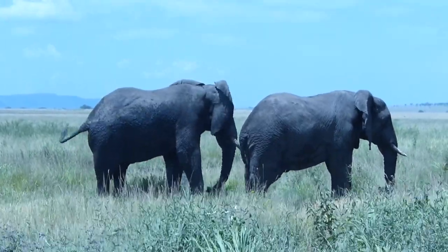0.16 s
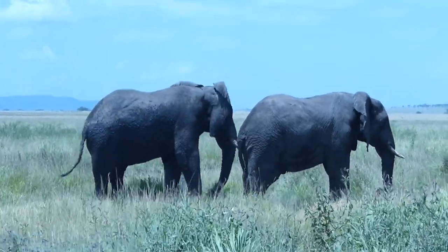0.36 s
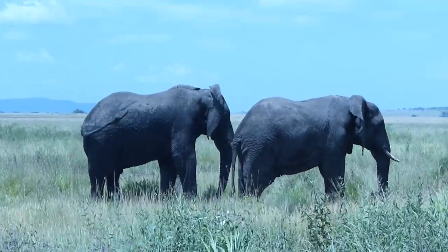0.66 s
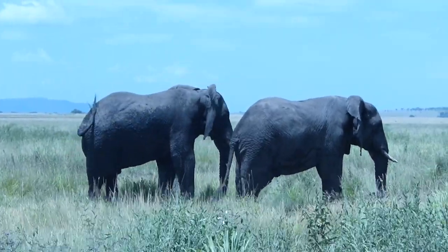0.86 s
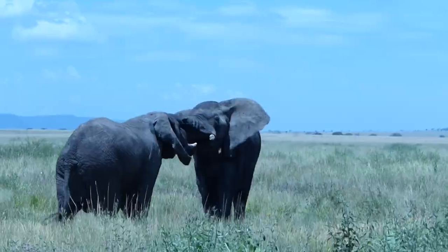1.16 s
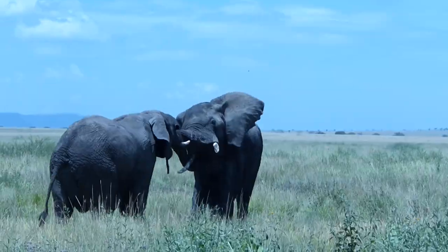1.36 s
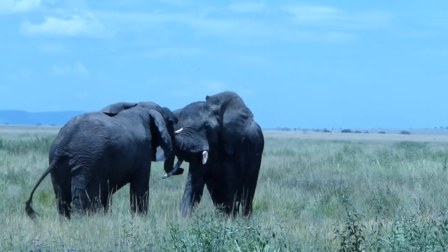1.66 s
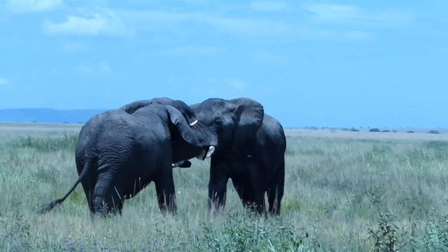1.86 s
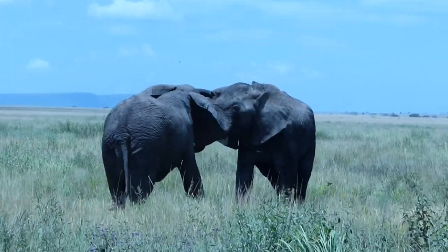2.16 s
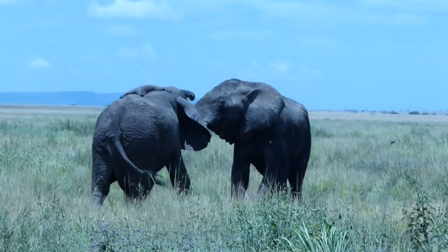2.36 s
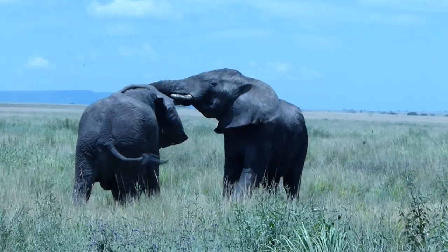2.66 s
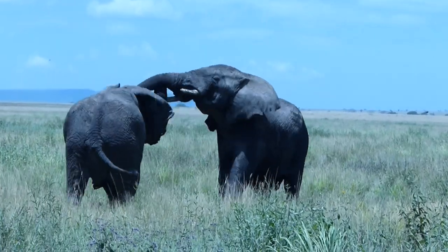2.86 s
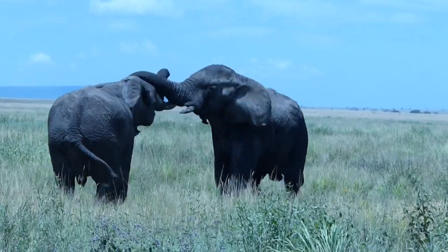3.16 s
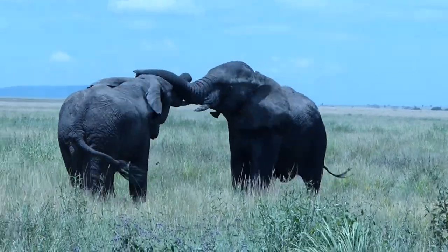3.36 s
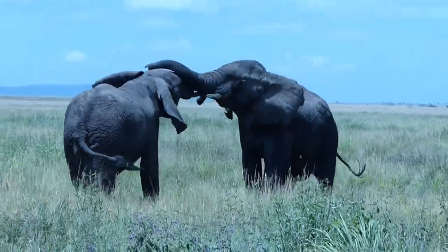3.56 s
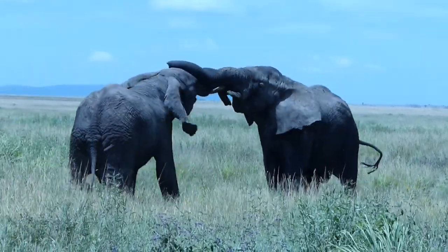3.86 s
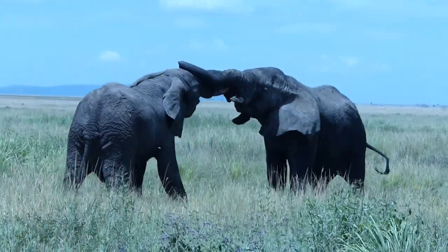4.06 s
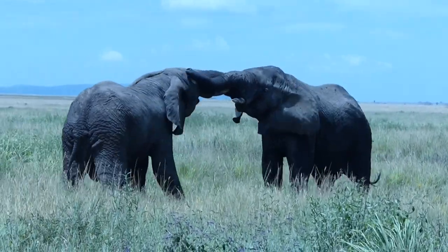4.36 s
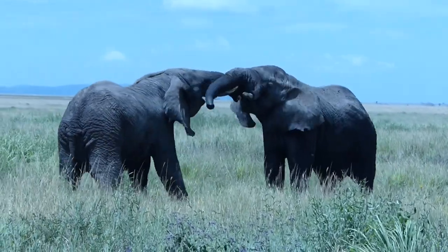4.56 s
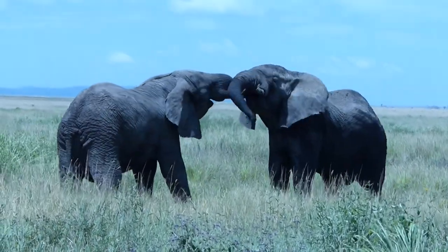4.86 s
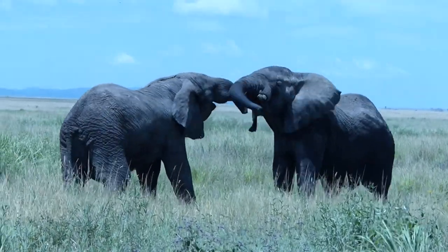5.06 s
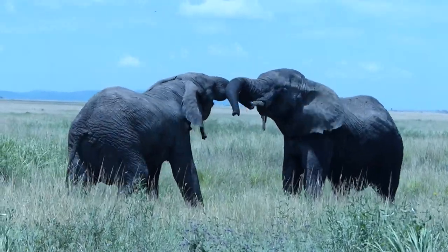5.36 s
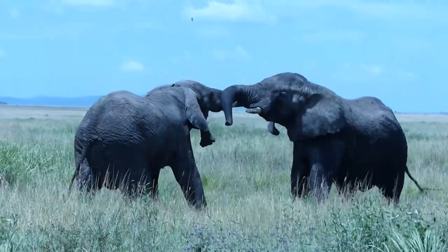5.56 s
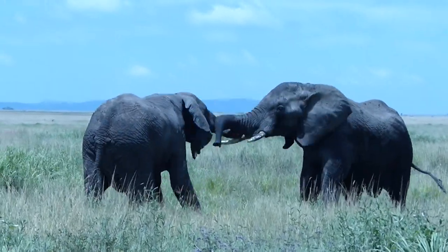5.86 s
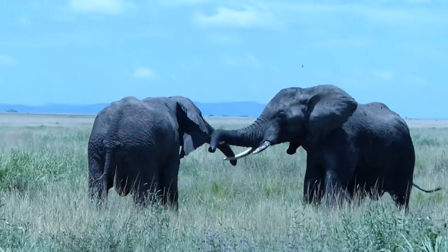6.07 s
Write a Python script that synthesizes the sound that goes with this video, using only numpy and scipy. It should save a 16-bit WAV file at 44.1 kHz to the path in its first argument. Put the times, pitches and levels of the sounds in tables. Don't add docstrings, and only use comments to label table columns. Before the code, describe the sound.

Faint open grassland air opens with a low wind puff on the microphone, distant hum and thin grass hiss. A small sharp handling knock and tick falls at 0.5 s. At 1.1 s everything cuts to complete silence until 1.4 s, when slightly windier air returns. Close and slightly left, a small camera motor ratchets loudly from 1.5 to 2.1 s: about eleven cycles a second, each an uneven chain of bright metal and plastic clicks ringing a hard hollow shell. It repeats at 2.6-3.2 s, longest at 3.5-4.4 s while fading slightly, and briefly at 4.7-5.1 s. Soft knocks, faint ticks and tiny far chirps sit in the gaps. From 5.4 s quiet dry stalk ticks, crackly brushes and chirps gather, with a tiny high squeak near 5.9 s and a final wind gust at 6.2 s.

```python
import sys
import numpy as np
from scipy import signal
from scipy.io import wavfile

SR = 44100
rng = np.random.default_rng(int(sys.argv[2]) if len(sys.argv) > 2 else 0)


def ratio_of_db(decibels):
    return 10 ** (np.asarray(decibels, float) / 20)


def file_out(sig):
    cols = np.atleast_2d(sig).T
    lim = np.clip(cols, -1, 1)
    pcm = np.round(lim * 32767).astype(np.int16)
    wavfile.write(sys.argv[1], SR, pcm)


N = 273552
TIME_S = np.arange(N) / SR
SILENCE_START_S, SILENCE_END_S = 1.118, 1.4055


def at_hz(points, hz):
    table_hz, values = np.transpose(points)
    return np.interp(np.log(hz), np.log(table_hz), values)


def rms_one(x):
    return x / np.sqrt(np.mean(x ** 2) + 1e-20)


def drift(rate_hz):
    r = np.exp(-80 * np.pi * rate_hz / SR)
    noise = rng.standard_normal(N // 40 + 1002)
    slow = signal.lfilter([1], [1, -2 * r, r * r], noise)[1000:]
    return np.interp(np.arange(N) / 40, np.arange(len(slow)), rms_one(slow))


def resonance(x, hz, width_hz):
    r = np.exp(-np.pi * width_hz / SR)
    b = np.sqrt((1 - r * r) / 2) * np.array([1, 0, -1])
    return signal.lfilter(b, [1, -2 * r * np.cos(2 * np.pi * hz / SR), r * r], x)


def left_right(pan_db):
    return ratio_of_db(pan_db / 2 * np.array([[1], [-1]]))


def pair(mid, side, alike, pan_db):
    alike = np.clip(alike, -1, 1)
    common = np.sqrt(1 + alike) * mid
    opposed = np.sqrt(1 - alike) * side
    left = (common + opposed) * ratio_of_db(pan_db / 2)
    right = (common - opposed) * ratio_of_db(-pan_db / 2)
    return np.stack([left, right]) / np.sqrt(2)


def rattle(shape, spread_db):
    uneven_db = spread_db * np.minimum(rng.exponential(1, shape), 5)
    return rms_one(rng.standard_normal(shape) * ratio_of_db(uneven_db))


# first_cycle_s [s], last_cycle_s [s], first_level_db [dB], last_level_db [dB]
BURSTS = [
    (1.4896, 2.0298, 0, 0),
    (2.6254, 3.076, -0.5, 0),
    (3.544, 4.3537, -0.5, -1.95),
    (4.686, 5.0455, -1, -2.1),
]
CYCLE_S = .09


def cycle_times():
    starts, levels_db, last = [], [], []
    for first_s, last_s, first_db, last_db in BURSTS:
        count = round((last_s - first_s) / CYCLE_S) + 1
        starts += list(np.linspace(first_s, last_s, count))
        levels_db += list(np.linspace(first_db, last_db, count))
        last += [0] * (count - 1) + [1]
    return starts, levels_db, last


LEAD, SIZE = 200, 7000
FORCE_DB = .8

# start_ms [ms], build_up_ms [ms per 9 dB], die_away_ms [ms per 9 dB],
# metal_db [dB], body_db [dB]
CONTACTS = [(1.7, 1.8, 2.0, -13, -28), (4.5, 1, 8.5, -25.5, -32), (13.8, 2, 3, -22.5, -29),
            (15.74, 2, 2, -21, -27), (19.6, 1.5, 5, -27.5, -30.5), (24.5, 1, 6, -33, -36),
            (34.35, 2, 1, -20, -30.5), (37.4, 1.1, 1.5, -12, -29), (39.5, 0.9, 3.5, -14, -27),
            (45, 0, 8, -25.5, -35.5), (51.7, 1.5, 12, -25, -32.5), (56.5, 0.3, 8, -26.5, -30),
            (60.34, 0.2, 1.5, -15.5, -36), (63.95, 1.9, 2.5, -10, -24), (66.8, 1.5, 8.5, -18, -27.5),
            (73.5, 1, 6, -25.5, -33.5), (80.3, 2, 3.5, -29, -33)]
SETTLING = [
    (90.6, 2.2, 3.9, -24.5, -33),
    (101.7, 2.2, 5.6, -35, -39.5),
]


def contact_swarms(last, slack_ms=.15):
    table = np.array(CONTACTS + SETTLING)
    shape = (len(last), len(table), 1)
    ms = (np.arange(SIZE) - LEAD) * 1e3 / SR
    late = ms - table[:, :1] - slack_ms * rng.standard_normal(shape)
    swarm = np.exp(np.where(late < 0, late / table[:, 1:2], -late / table[:, 2:3])) ** 2
    swarm *= ratio_of_db(2 * FORCE_DB * rng.standard_normal(shape))
    swarm[:, len(CONTACTS):] *= np.reshape(last, (-1, 1, 1))
    first = np.roll(last, 1)[:, None]
    kick = 1 + first * 0.68 * (ms < 2.5)
    swarm *= np.where(first * (ms < .6), .002, kick)[:, None]
    return swarm


# start_ms [ms], middle_db [dB], hollow_db [dB], deep_db [dB]
BLOWS = [(1.302, -26.5, -36.5, -52), (15.3, -26, -33.5, -52), (22.07, -33.5, -57, -46.5),
         (35.53, -45, -33, -43), (39, -32.5, -35, -55.5), (54.48, -43, -44, -48), (62.1, -32.5, -47, -53),
         (64.05, -35.5, -31.5, -43.5), (69, -43, -32.5, -48.5)]


def clean_blows(count, jitter_ms=.03):
    blows = np.array(BLOWS)
    ms = blows[:, 0] + jitter_ms * rng.standard_normal((count, len(blows)))
    at = (LEAD + ms * SR / 1e3).astype(int)
    return at, ratio_of_db(FORCE_DB * rng.standard_normal(at.shape))


# pitch_hz [Hz], width_hz [Hz], level_db [dB]
BRIGHT = [(3500, 380, -4.5), (4120, 280, -0.5), (5000, 380, -0.5), (5620, 530, -0.5), (6480, 450, 0.5),
          (7400, 640, 0), (8270, 670, -2), (9260, 410, -2.5), (10540, 780, -4), (11800, 1300, -7.5),
          (14100, 2200, -22)]
MIDDLE = [(1295, 100, -6), (1400, 80, -4.5), (1516, 90, -4.5), (1730, 140, -5.5), (1970, 200, -3),
          (2353, 150, -0.5), (2613, 164, -1), (2933, 160, -3)]
HOLLOW = [(811, 42, -11), (916, 38, -5), (1007.7, 44, -1.5), (1056, 44, -4), (1107.5, 45, 3.5)]
DEEP = [(500, 35, -1), (550.3, 35, 2), (643, 35.3, 3)]
# repeated_share [0-1, same in each cycle], left_right_likeness [0-1],
# left_over_right_db [dB]
SHELL = [
    (.4, .79, 3.0),
    (.55, .5, 5.0),
    (.7, .2, 7.0),
    (.7, .75, -1.0),
]


def ring_shell(k, swarm, blow_at, blow_force, colour_db=1.5):
    modes = (BRIGHT, MIDDLE, HOLLOW, DEEP)[k]
    coupling_db = (0, 0, -10.5, -20.5)[k]
    repeat, alike, pan_db = SHELL[k]
    table, blows = np.array(CONTACTS + SETTLING), np.array(BLOWS)
    rows = np.arange(len(swarm))[:, None]
    group = 0
    for order, (hz, width_hz, db) in enumerate(modes):
        level_db = table[:, 4] + coupling_db if k else table[:, 3]
        level_db = level_db + (level_db + 16) * .22 * max(np.log(hz / 7000), 0)
        drive = ratio_of_db(level_db + db - 6.5 + colour_db * rng.standard_normal(len(table)))
        if order % 3 == 0:
            same_hits = rattle((2, 1, SIZE), 2.84)
            new_hits = rattle((2, len(swarm), SIZE), 2.64)
            hits = np.sqrt(repeat) * same_hits + np.sqrt(1 - repeat) * new_hits
        strength = np.sqrt(np.einsum("c,fct->ft", drive ** 2, swarm))
        force = (-1) ** order * strength * hits
        if k:
            blow = blow_force * ratio_of_db(blows[:, k] + db) / np.sqrt(4 * np.pi * width_hz / SR)
            quarter_turn = round(SR / hz / 4)
            force[0, rows, blow_at] += blow
            force[1, rows, blow_at + quarter_turn] += blow
        mid, side = resonance(force + 1e-12, hz, width_hz)
        group = group + pair(mid, side, alike * min(5000 / hz, 1) ** .4, pan_db)
    edge_hz = .85 * modes[0][0] * (1 if k else .6)
    return signal.sosfilt(signal.butter(3, edge_hz, "high", fs=SR, output="sos"), group)


def mechanism():
    starts, levels_db, last = cycle_times()
    swarm = contact_swarms(last)
    blow_at, blow_force = clean_blows(len(starts))
    cycles = sum(ring_shell(k, swarm, blow_at, blow_force) for k in range(4))
    out = np.zeros((2, N))
    for k, s in enumerate(starts):
        at = round(s * SR) - LEAD
        out[:, at:at + SIZE] += ratio_of_db(levels_db[k]) * cycles[:, k]
    return out


def running(edge_s=.08):
    return sum(np.clip(np.minimum(TIME_S - first_s, last_s + CYCLE_S - TIME_S) / edge_s, 0, 1)
               for first_s, last_s, *_ in BURSTS)


# start_s [s], peak_db [dB], pitch_hz [Hz], left_over_right_db [dB]
KNOCKS = [(.03, -41, 206, 2), (.04, -48, 480, 0), (.4808, -29.5, 735, 2), (.535, -43, 148, 0),
          (.555, -47.5, 350, 0), (2.19, -40, 500, 0), (2.2, -42.5, 300, 0), (2.267, -39, 800, 0),
          (2.268, -43.5, 1150, 0), (2.293, -40, 1150, 0), (2.31, -42, 597, 0), (2.32, -45.5, 200, 0),
          (2.402, -41, 550, 0), (2.412, -41, 453, 0), (2.412, -44.5, 190, 0), (3.367, -43, 795, 2),
          (3.378, -39, 480, 6), (5.26, -39, 188, -3), (5.745, -41, 740, 2), (5.95, -43, 740, 2)]


def knocks(swings=17.0):
    out, t = np.zeros((2, N)), np.arange(4000) / SR
    for s, db, hz, pan_db in KNOCKS:
        at = round(s * SR)
        fade = ratio_of_db(db + 4.5 - 60 * t * hz / swings)
        ring = fade * (1 - np.exp(-t * hz)) * np.sin(2 * np.pi * hz * t)
        out[:, at:at + len(t)] += ring * left_right(pan_db)
    return out


# start_s [s], peak_db [dB], pitch_hz [Hz], left_over_right_db [dB]
TICKS = [(.4805, -26, 3200, 1), (0.4809, -33, 6460, 0.5), (0.481, -41, 1400, 2), (5.4194, -44, 10000, 0),
         (5.705, -36, 9000, 5), (5.755, -44, 2500, 2), (5.765, -38, 11000, -1), (5.785, -31, 1500, 7),
         (5.785, -34, 4500, 7), (5.829, -37, 3000, 6), (6.05, -40, 2500, 5), (3.366, -38, 2400, 2),
         (3.415, -39.5, 3000, 2), (3.318, -40, 3000, 1), (1.407, -35.5, 5000, 4)]


def stalk_ticks():
    out, t = np.zeros((2, N)), np.arange(4000) / SR
    for s, db, hz, pan_db in TICKS:
        at = round(s * SR)
        snap = resonance(rng.standard_normal(len(t)) * np.exp(-t / 0.0016), hz, 0.58 * hz)
        out[:, at:at + len(t)] += ratio_of_db(db - 1.5) * snap * left_right(pan_db)
    return out


# centre_s [s], length_s [s], level_db [dB], pitch_hz [Hz]
BRUSHES = [(2.44, 0.034, -55, 6000), (3.513, .04, -50, 6000), (5.555, 0.011, -47, 6000),
           (5.718, 0.013, -40, 7000), (5.798, 0.009, -44, 7000), (5.838, .015, -38.5, 7400),
           (5.872, 0.021, -41.5, 6360), (5.938, .015, -44.5, 5500), (5.987, .012, -46, 5500),
           (6.059, 0.024, -40.5, 7400), (6.102, 0.0091, -41, 6000), (6.189, 0.014, -46, 6500)]


def brushes(pan_db=4.5):
    out = np.zeros((2, N))
    for s, length_s, db, hz in BRUSHES:
        at = np.arange(round((s - .1) * SR), min(round((s + .1) * SR), N))
        swell = ratio_of_db(db) * np.exp(-.5 * ((at / SR - s) / length_s) ** 2)
        crackle = resonance(rattle((2, len(at)), 2.2), hz, 0.71 * hz)
        mid, side = resonance(crackle, hz, 1.0 * hz)
        out[:, at] += swell * rms_one(pair(mid, side, 0.74, pan_db))
    return out


# time_s [s], pitch_hz [Hz], level_db [dB]
SQUEAK = [
    (5.865, 7440, -70),
    (5.872, 7600, -43),
    (5.886, 7570, -40),
    (5.892, 7000, -50),
    (5.897, 6600, -77),
]


def squeak():
    s, hz, db = np.transpose(SQUEAK)
    pitch_hz = np.interp(TIME_S, s, hz) * (1 + .01 * drift(147))
    tone = np.sin(2 * np.pi * np.cumsum(pitch_hz) / SR)
    heard = (TIME_S > s[0]) * (TIME_S < s[-1])
    return ratio_of_db(np.interp(TIME_S, s, db) + 11) * tone * heard


def opening_offset(step_db=-50, settle_s=.16):
    t = TIME_S - SILENCE_END_S
    return ratio_of_db(step_db) * (t > 0) * np.exp(-np.abs(t) / settle_s)


# centre_s [s], length_s [s], level_db [dB], pitch_hz [Hz]
CHIRPS = [(2.31, .01, -60, 4400), (2.56, .014, -52, 4300), (3.475, .022, -55, 4300),
          (3.53, .015, -51, 4350), (3.437, .004, -49, 6400), (2.45, .012, -60, 2050),
          (5.563, .008, -52, 7100), (5.72, .012, -51, 6200), (5.8, .015, -51, 4100),
          (5.86, .025, -49, 6100), (5.94, .006, -48, 6000), (5.988, .006, -51, 6300),
          (6.058, .015, -51, 7100), (6.09, .02, -56, 6100)]


def chirps():
    out = np.zeros((2, N))
    for s, length_s, db, hz in CHIRPS:
        at = np.arange(round((s - .05) * SR), round((s + .05) * SR))
        whistle = resonance(resonance(rng.standard_normal(len(at)), hz, 250), hz, 250)
        swell = np.exp(-.5 * ((at / SR - s) / length_s) ** 2)
        out[:, at] += ratio_of_db(db) * swell * rms_one(whistle)
    return out


def rises(events):
    return sum(db * np.exp(-.5 * ((TIME_S - s) / length_s) ** 2) for s, length_s, db in events)


def air(spectrum, likeness, levels_db, patchy_db, pan_db, span_s):
    parts = [0, 0, 0]
    edges = 32.5 * 2 ** (np.arange(28) / 3)
    a, b = (round(s * SR) for s in span_s)
    white = rng.standard_normal((2, 2, b - a))
    for k, (low, high) in enumerate(zip(edges, edges[1:])):
        band = signal.butter(2, [low, high], "band", fs=SR, output="sos")
        mid, side = signal.sosfilt(band, white[k % 2])
        hz = np.sqrt(low * high)
        part = int(hz > 330) + int(hz > 3300)
        flicker = drift(16) + (1 + (hz < 1500)) * .6 * drift(40)
        gain = ratio_of_db(at_hz(spectrum, hz) + patchy_db * flicker[a:b])
        parts[part] = parts[part] + gain * pair(mid, side, at_hz(likeness, hz), pan_db * part / 2)
    out = np.zeros((2, N))
    for part, db in zip(parts, levels_db):
        out[:, a:b] += ratio_of_db(db[a:b]) * part / np.sqrt(np.mean(np.mean(part, axis=0) ** 2))
    return out


# pitch_hz [Hz], level_db [dB per Hz]
EARLY_AIR = [(30, -29), (100, -11), (190, -4), (330, -8), (480, -14.5), (700, -5), (1050, -11),
             (1850, -12.5), (2700, -22.5), (4100, -20), (5100, -6), (6300, -10.5), (10400, -12),
             (15800, -30)]
LATE_AIR = [(30, -29), (64, -18), (110, -4), (190, -4), (350, -10.5), (1000, -9.5), (1900, -19),
            (2700, -21.5), (4000, -22.5), (5200, -15.5), (6500, -16.5), (10100, -21), (13000, -32),
            (15800, -42)]
# pitch_hz [Hz], left_right_likeness [-1 to 1]
EARLY_ALIKE = [(60, 0.78), (240, 0.73), (950, 0.97), (3770, 1.0), (15000, 0.97)]
LATE_ALIKE = [(60, -0.42), (150, -0.64), (300, -0.33), (600, -0.18), (1650, 0.2), (5000, 0.82), (15000, .3)]
# centre_s [s], length_s [s], rise_db [dB]
GUSTS = [
    (.01, .05, 12.5),
    (.55, 0.064, 4),
    (1.4, .05, 6),
    (2.3, 0.17, 2),
    (4.92, 0.15, 5),
    (5.65, 0.062, 4),
    (5.93, .06, 2),
    (6.19, .05, 10),
]
# centre_s [s], length_s [s], rise_db [dB]
SWELLS = [
    (1.4, .05, 4),
    (2.38, .15, 3),
    (3.35, 0.22, 3.5),
    (5.8, 0.17, 1.5),
]
# centre_s [s], length_s [s], rise_db [dB]
STIRS = [
    (2.45, 0.086, 2),
    (3.2, 0.086, 5),
    (3.55, 0.13, 7.5),
    (5.82, 0.23, 7),
]


def grassland():
    shake_db = 5 * running()
    lift_db = np.array([rises(GUSTS), rises(SWELLS) + shake_db, rises(STIRS)])
    early_db = lift_db + np.array([[-63.5], [-56], [-51]])
    late_db = lift_db + np.array([[-58.5], [-55], [-52.5]])
    early = air(EARLY_AIR, EARLY_ALIKE, early_db, patchy_db=1.0, pan_db=0, span_s=(0, SILENCE_START_S))
    late = air(LATE_AIR, LATE_ALIKE, late_db, patchy_db=1.45, pan_db=1.2, span_s=(SILENCE_END_S, N / SR))
    return early + late


def scene():
    close = mechanism() + knocks() + stalk_ticks() + brushes() + squeak()
    return close + opening_offset() + chirps() + grassland()


def band_limit(x):
    return signal.sosfilt(signal.butter(12, 15990, fs=SR, output="sos"), x)


def record(dry):
    top_cut = signal.cheby2(20, 45, 15950, fs=SR, output="sos")
    mix = np.clip(signal.sosfilt(top_cut, dry), -1, 1)
    return band_limit(mix)


dry = scene()
out = record(dry)
file_out(out)
```